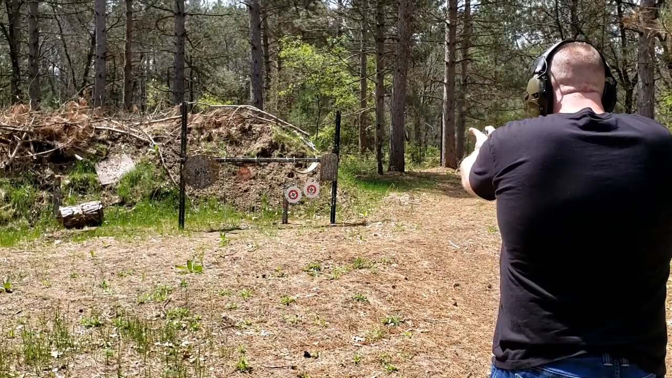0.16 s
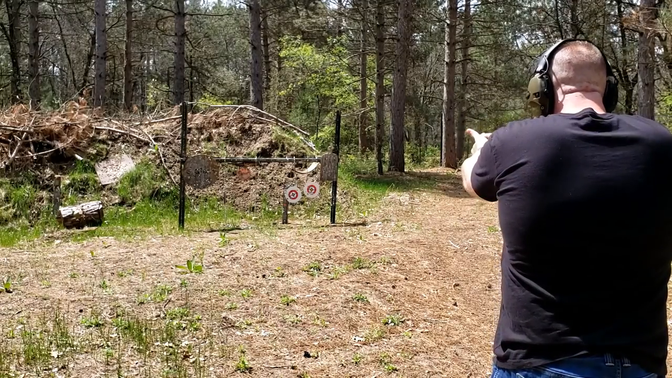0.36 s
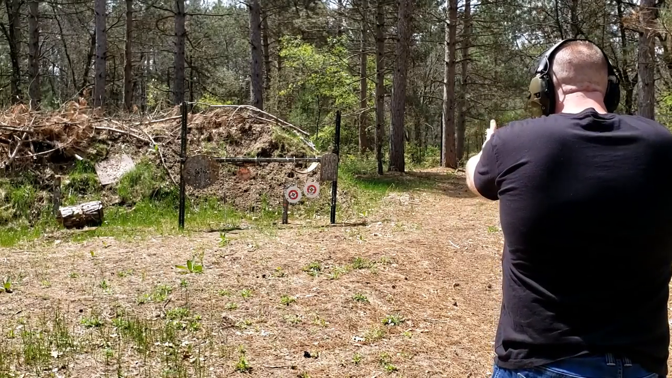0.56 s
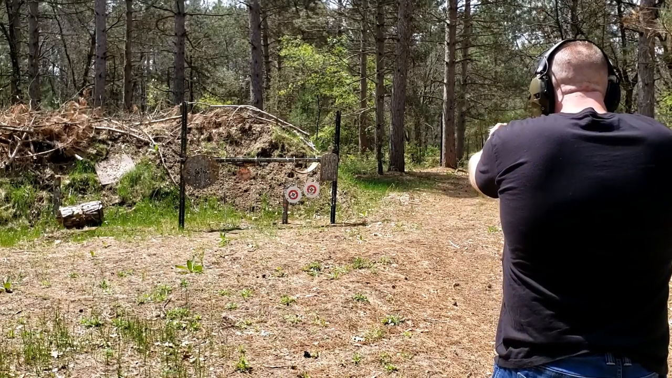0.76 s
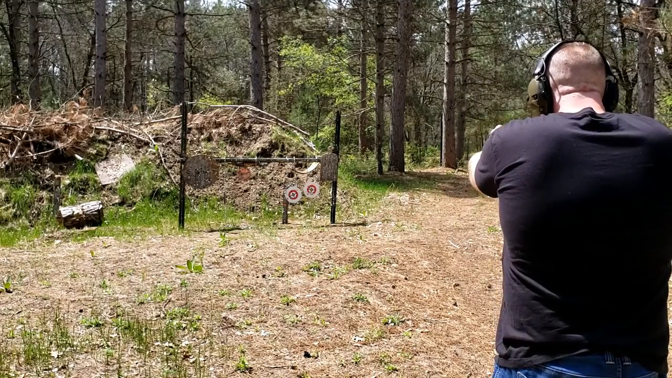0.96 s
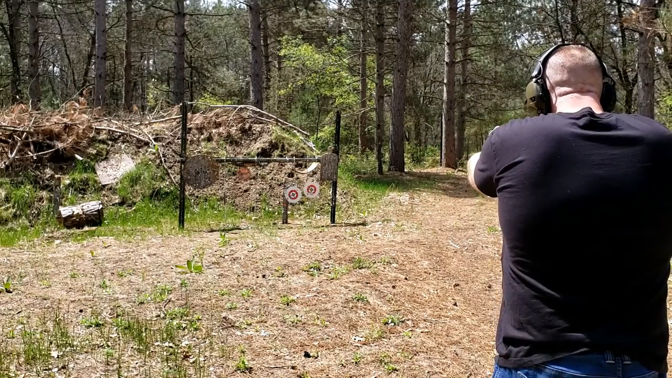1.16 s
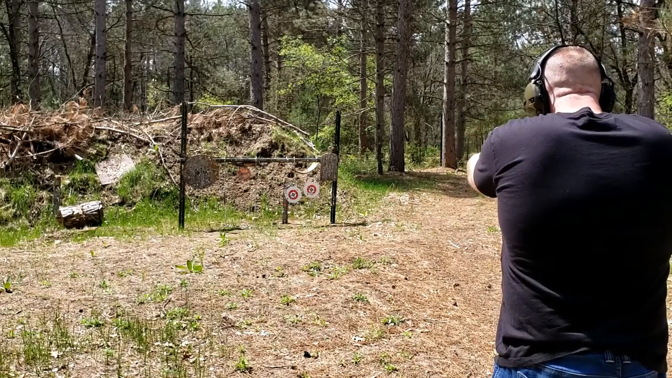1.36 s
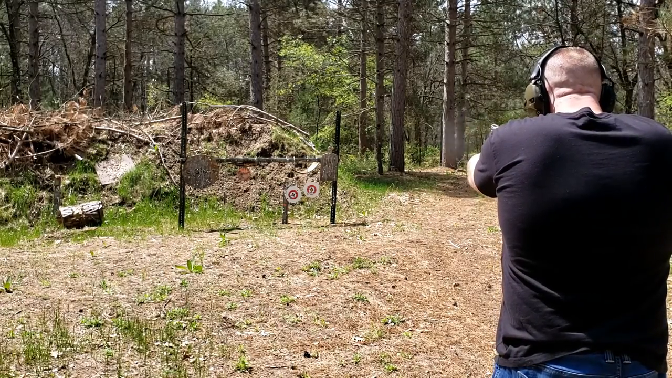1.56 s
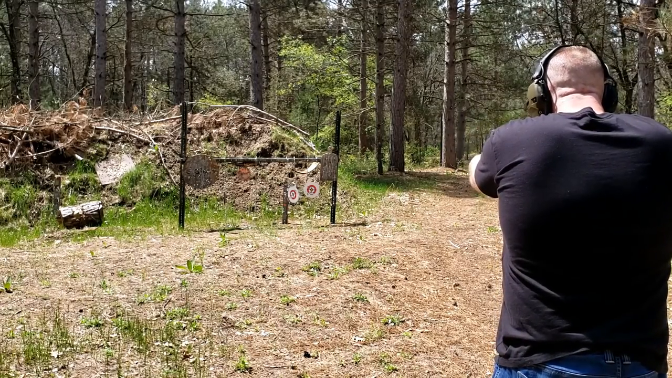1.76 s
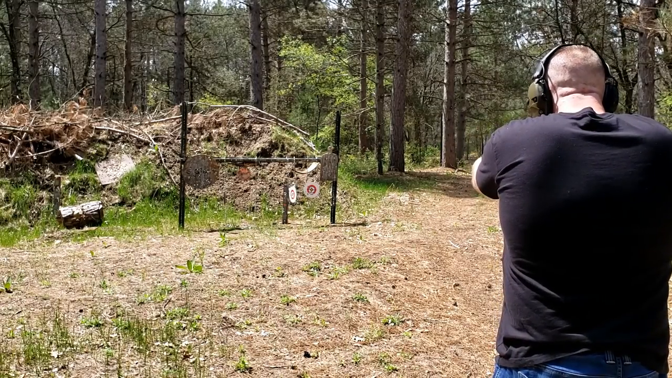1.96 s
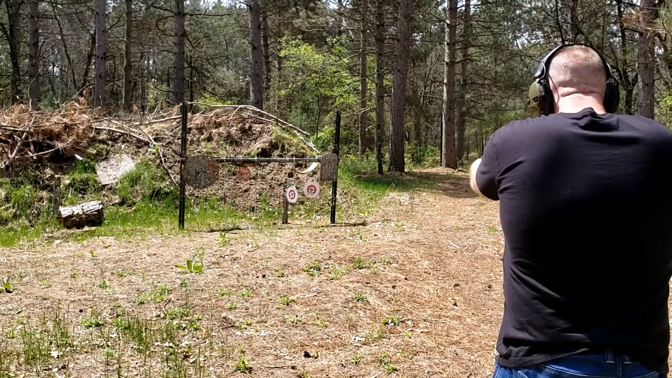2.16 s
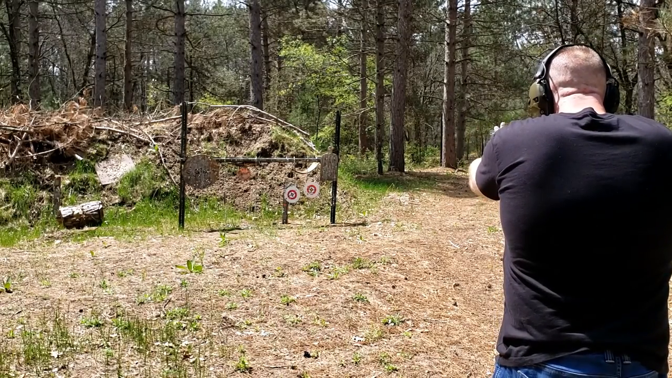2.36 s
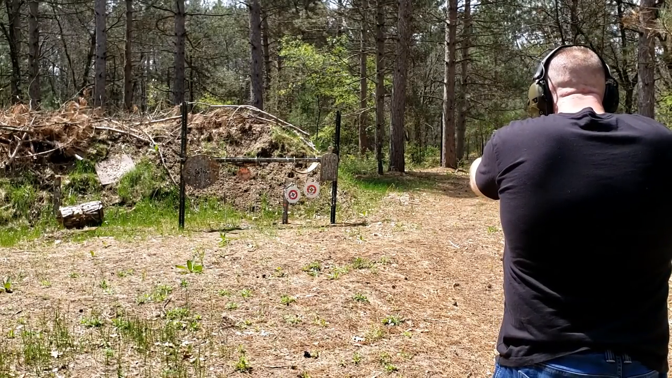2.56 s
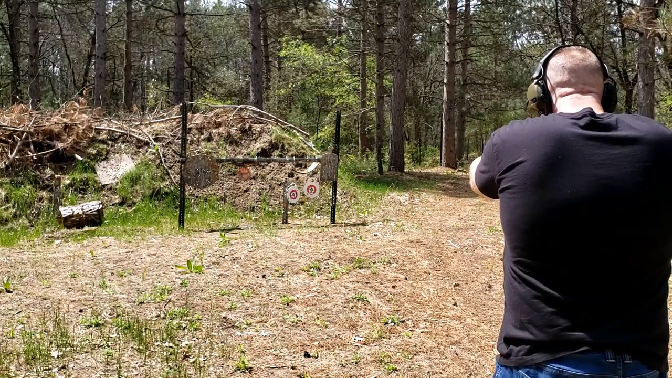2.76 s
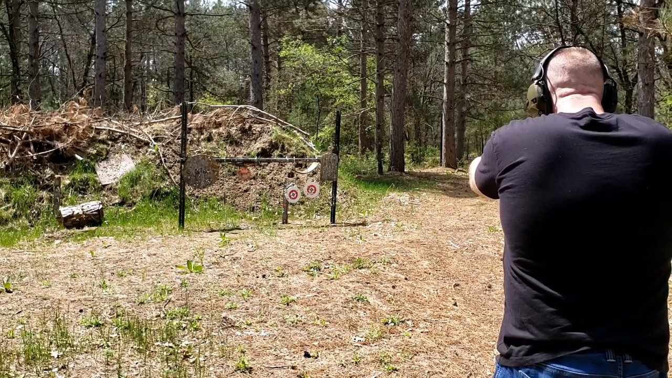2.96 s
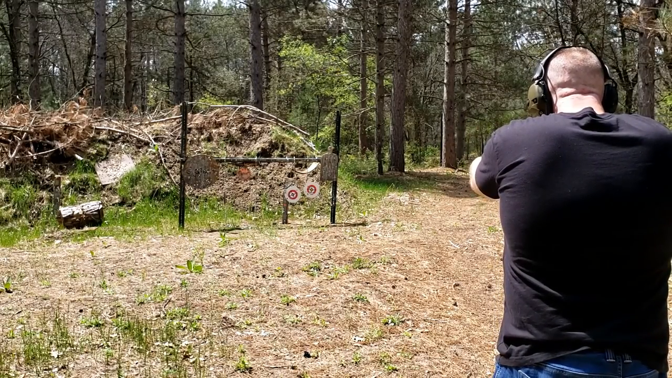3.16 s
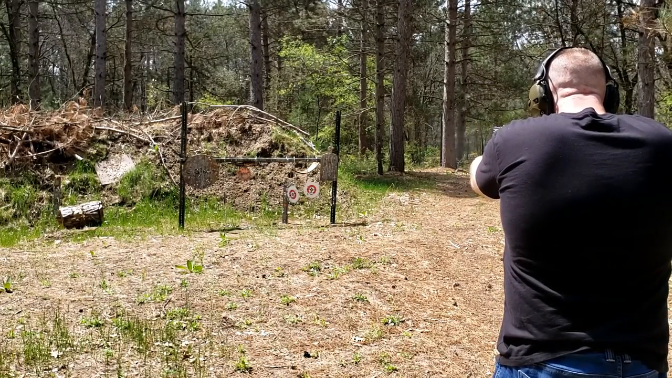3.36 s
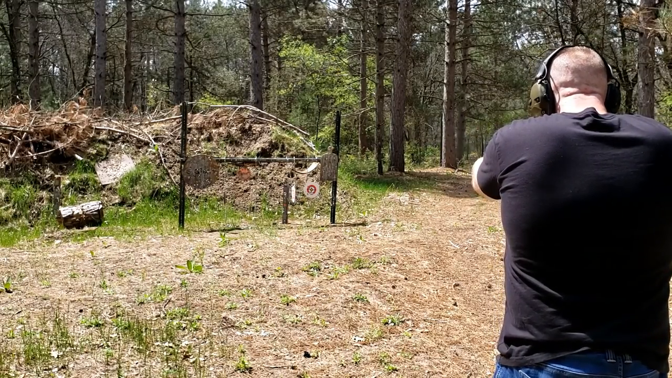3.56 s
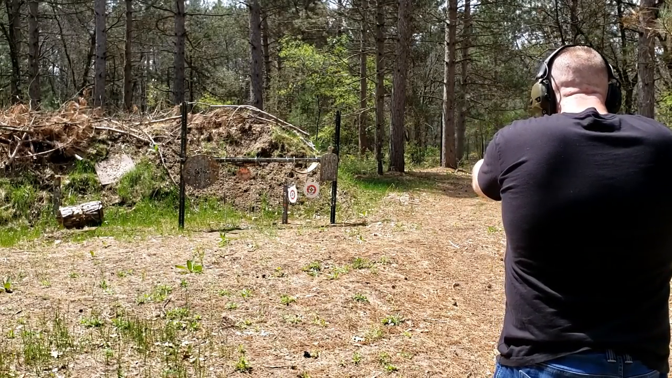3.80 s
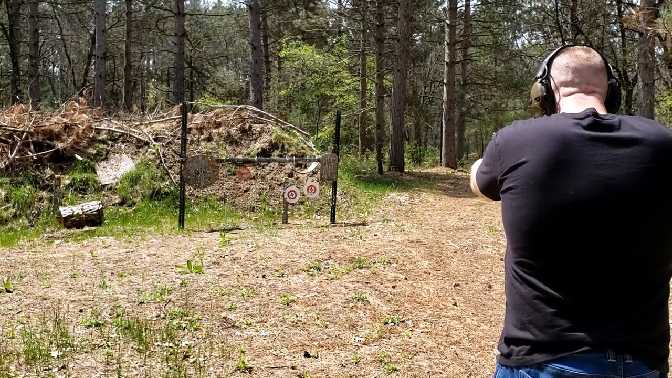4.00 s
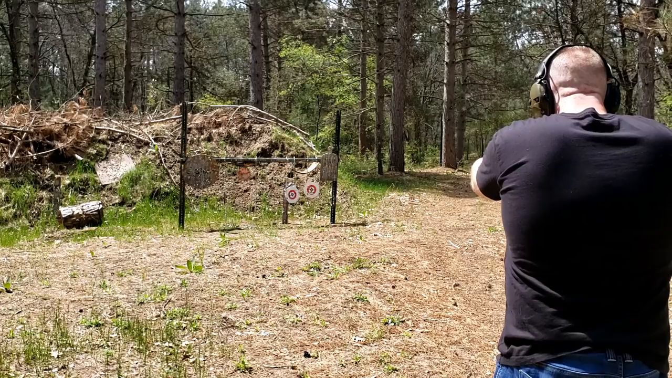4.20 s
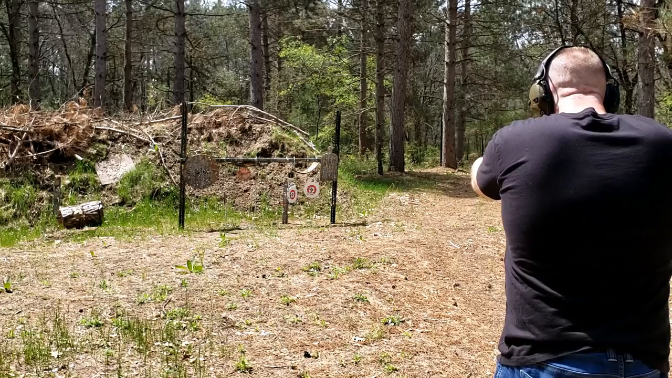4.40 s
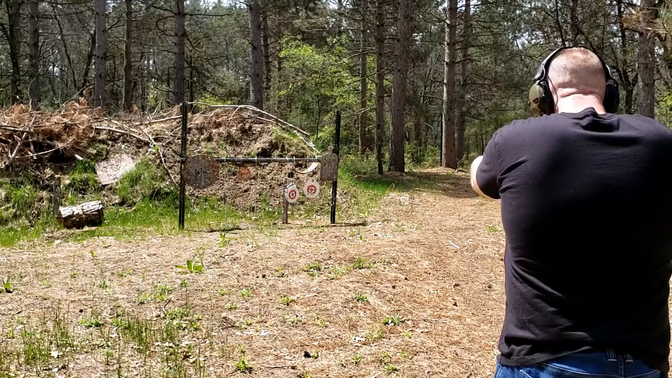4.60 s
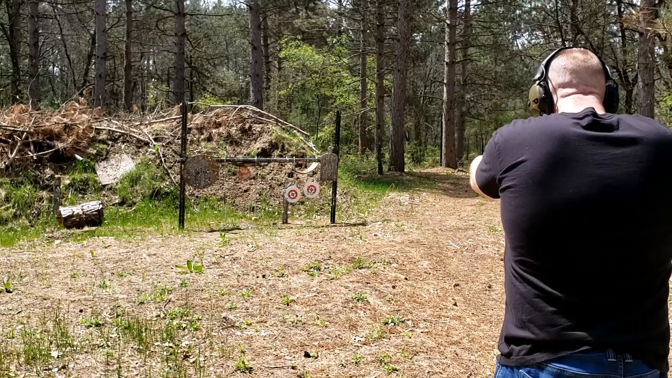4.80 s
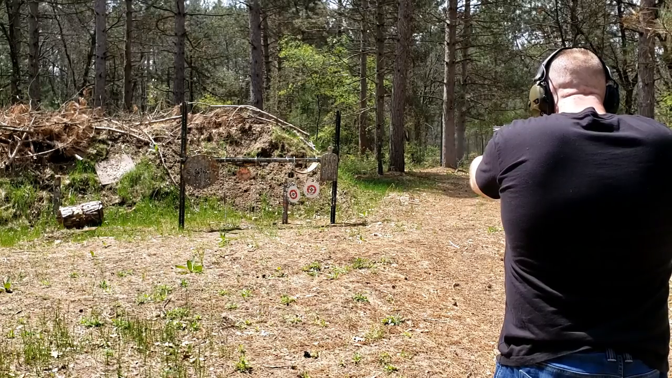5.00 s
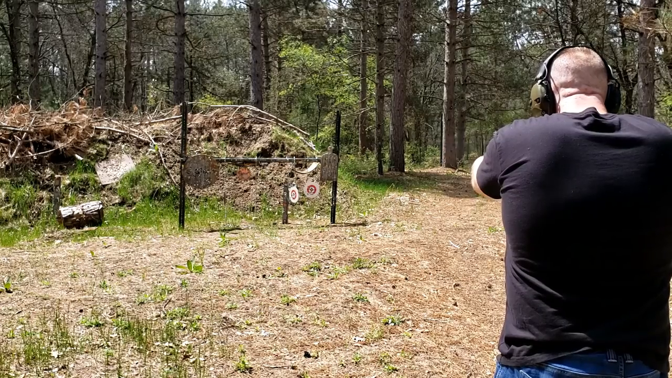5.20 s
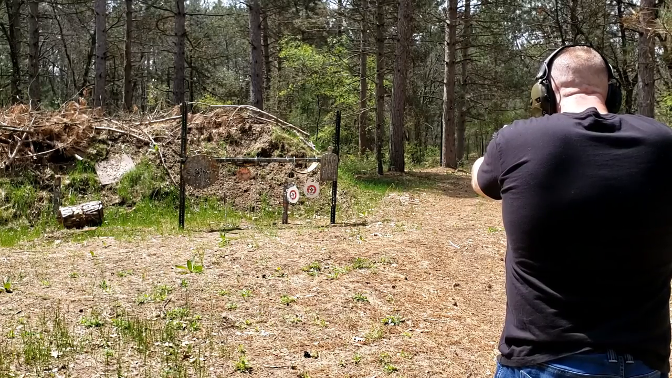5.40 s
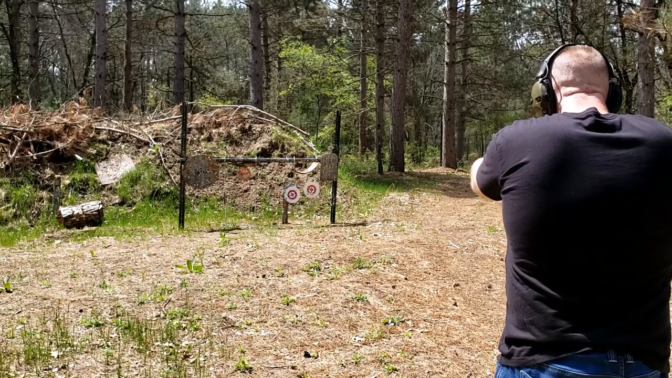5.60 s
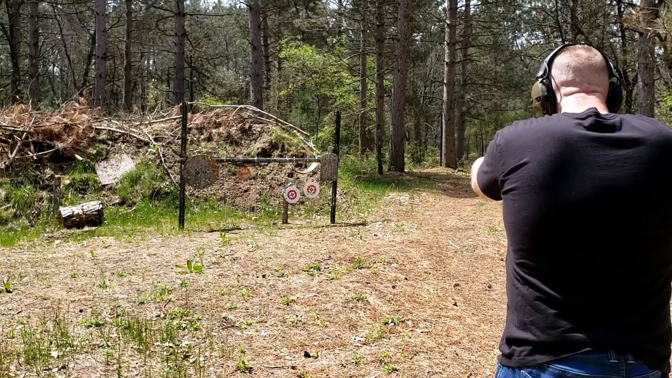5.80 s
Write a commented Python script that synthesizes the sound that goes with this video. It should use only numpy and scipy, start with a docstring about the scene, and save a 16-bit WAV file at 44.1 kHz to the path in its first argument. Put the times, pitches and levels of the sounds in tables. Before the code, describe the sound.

Outdoor shooting range among trees, microphone a few steps from the shooter. A gunshot tail fades, then three loud, clipping revolver shots come under two seconds apart, scattering briefly among the trunks. A bright steel ring follows each of the first two almost at once, leaving a thin hum; the third hit only smacks. Tiny hammer and cylinder ticks come between shots over faint breeze and distant drone.

```python
"""A shooting range in a pine wood: a small revolver fires at an even pace, a few steps from the microphone.
Each blast is a steep pressure pulse with a noisy crack, heard directly, off the ground and off a nearby
surface, with a sinking boom; banded noise makes its scatter among the trunks. Two bullets ring a swinging
steel plate, built from decaying sine modes; the last is a dead smack. Noise ticks are the hammer and cylinder,
gliding sines a bird, flickering noise bands the breeze and resonant noise a distant drone."""
import sys
import numpy as np
from scipy import signal
from scipy.fft import rfft, irfft, next_fast_len
from scipy.io import wavfile
from scipy.ndimage import uniform_filter1d

SR = 44100
rng = np.random.default_rng(int(sys.argv[2]) if len(sys.argv) > 2 else 0)


def generate_wav(signal):
    """Clip the signal to [-1, 1] and save it as 16-bit WAV at the path in sys.argv[1]."""
    frames = np.transpose(np.atleast_2d(signal))
    scaled = np.clip(frames, -1, 1) * 32767
    pcm = np.round(scaled).astype(np.int16)
    wavfile.write(sys.argv[1], SR, pcm)


N = 257984
T = np.arange(N) / SR

# Revolver shots; the first is already dying away at the start:
# start_s, level_db, muzzle_pulse_db, boom_db, boom_left_minus_right_db, boom_left_hz, boom_right_hz
SHOT_LIST = [(-.115, 0.5, 0, -7, 1, 52.3, 66.5), (1.6976, 0.5, -7, -4, -5.5, 44.75, 55),
             (3.4255, -1, -2.5, 1.5, -3, 41.86, 76.7), (5.0869, -0.5, 3.5, 1.5, -3, 42, 68)]
# Paths of the blast (direct, ground, nearby surface), levels relative to the shot:
# delay_s, left_ear_lag_s, pulse_height (gain), rise_s, pulse_length_s, crack_db, crack_decay_s
BLAST_PATHS = [(.0008, 0.000042, 1, 0.00039, 0.002, -7.5, 0.00072),
               (.0040, 0.00021, -1.39, 0.00018, 0.0014, -19.5, .001),
               (.0211, .00028, -1.2, .00022, 0.00051, -9.5, .0007)]
# Echo of the wood, levels per third of an octave relative to the shot:
# band_hz, early_db, early_t60_s, late_db, late_t60_s
WOOD_ECHO = [(50, -51, .2, -74, 1.0), (110, -45.5, 0.48, -69, 1.2), (170, -36.5, 0.3, -67, 1.5),
             (330, -40, 0.46, -64.5, 1.7), (500, -32.5, 0.65, -45, 1.76), (726, -27, 0.56, -41.5, 1.995),
             (1023, -24, 0.63, -43, 2.04), (1750, -29, 0.24, -48, 1.71), (2230, -30.5, 0.75, -46.5, 1.985),
             (3015, -32.5, 0.58, -47.5, 1.42), (5200, -32, 0.55, -47, 1.1), (7300, -31, 0.48, -52, 0.98),
             (8800, -29.5, 0.4, -45, .7), (11700, -19.5, 0.38, -52, 0.85), (16030, -24, .27, -55, .5)]
# Tone of the scattered sound, which loses its top octave: frequency_hz, gain_db
ECHO_TONE = [(6500, 0.5), (7300, 5.5), (7800, -2), (8400, -8.5), (16000, -9)]
# Bullet impacts; the last is a dead smack without ring: start_s, level_db, decay_s
BULLET_HITS = [(1.7480, -28.5, 0.0087), (3.4730, -24, 0.0067), (5.1371, -19, 0.0036)]
# Two bullets ring the plate and set it swinging: clang_db, clang_swell_s, hum_db, hum_t60_s,
# first_facing_s (after the hit), facing_interval_s, edge_on_drop_db
PLATE_RINGS = [(6, 0.059, -46, 4.08, .25, 1, 5.5), (-0.5, 0.0083, -54.5, 2.7, .48, .28, 9)]
# Modes of the steel plate: pitch_hz
PLATE_PITCHES = [2699, 3154, 3801, 4080, 4798, 5125, 5290, 5728, 6150, 6506, 6907, 7687, 7864, 8283, 8638,
                 9372, 10420, 10590, 12270, 12650, 13330, 14130, 14900, 15240]
# Ring of each mode, levels before the clang level: t60_s, first_hit_db, second_hit_db
PLATE_MODES = [(0.5, -44, -29), (0.38, -33, -36.5), (0.47, -40, -52), (0.37, -38.5, -32),
               (0.56, -41.5, -41), (0.34, -34, -30), (1.3, -70.5, -63), (0.28, -29, -58),
               (0.34, -29, -47.5), (0.37, -30.5, -36), (0.37, -26.5, -40), (0.2, -23.5, -53),
               (0.26, -28, -37), (0.18, -39.5, -46), (0.24, -31.5, -52.5), (.5, -51.5, -49.5),
               (0.17, -33.5, -55), (0.26, -37.5, -49), (.22, -33, -45), (.2, -38, -42), (.2, -37.5, -42),
               (.2, -43, -46), (.18, -34, -53.5), (0.15, -35.5, -52)]
# Hammer and cylinder clicks: start_s, level_db
GUN_CLICKS = [(0.4274, -67), (0.4923, -63), (2.3154, -60.5), (4.046, -64.5), (4.1115, -71), (4.1375, -76.5),
              (5.623, -72), (5.6945, -63.5)]
# Colour of those clicks: frequency_hz, gain_db
CLICK_TONE = [(1500, -16), (4500, -7), (7300, 8), (8800, -2), (10500, 3), (13000, 1), (16000, -8)]
# Bird calls: start_s, level_db
CALLS = [(.567, -78), (.694, -80)]
# Falling and rising note of a call, levels relative to the call:
# delay_s, length_s, start_hz, middle_hz, end_hz, level_db
CALL_NOTES = [(0, 0.034, 6240, 4980, 4260, 0), (.055, .025, 6150, 6850, 6980, -6)]
# Breeze in the trees, before its flicker: band_hz, level_db (per third of an octave)
BREEZE_BANDS = [(25, -102), (45, -85.5), (70, -76.5), (140, -70.5), (250, -84), (450, -79.5), (800, -71.5),
                (1250, -81), (1800, -89.5), (3000, -106), (6000, -107), (16000, -104)]
# Resonances of the far low drone, relative levels: centre_hz, width_hz, level_db
DRONE_RESONANCES = [(146, 70, -1), (273, 89, -6.5), (407, 90, -12)]
# Swells of the drone; the hold follows the attack: start_s, hold_s, level_db
DRONE_SWELLS = [(1.223, .34, -57.5), (2.9, 0.67, -63)]


def undb(db):
    """Decibels to gain."""
    return 10 ** (np.asarray(db) / 20)


def fade(t, t60):
    """Exponential decay by 60 dB in t60 seconds."""
    return np.exp(-np.log(1000) * t / t60)


def pan(db):
    """Left and right gains for a left-minus-right level difference."""
    return undb(np.array([[db], [-db]]) / 2)


def unit(x):
    """Scale to rms 1."""
    return x / np.sqrt(np.mean(x ** 2))


def add(out, s, sound):
    """Mix a sound in at time s, trimming whatever falls outside the scene."""
    i = int(round(s * SR))
    sound = sound[..., max(-i, 0):N - i]
    first = max(i, 0)
    out[:, first:first + sound.shape[-1]] += sound


def at(hz, table):
    """Read the columns of a table on a log-frequency axis."""
    f, *columns = np.transpose(table)
    return [np.interp(np.log(hz + 1e-9), np.log(f), c) for c in columns]


def shape(x, table):
    """Filter by a frequency_hz, gain_db spectrum."""
    n = x.shape[-1]
    hz = np.arange(n // 2 + 1) * SR / n
    return irfft(rfft(x) * undb(at(hz, table)[0]), n)


def colour(x, table):
    """Filter by a spectrum, then scale to rms 1."""
    return unit(shape(x, table))


def bands(x, alike_hz, count=29):
    """Split two noises into third-octave bands; below alike_hz both ears hear nearly the same."""
    n = x.shape[-1]
    spectrum = rfft(x)
    octave = np.log2(np.arange(n // 2 + 1) * SR / n + 1e-9)
    for hz in 22.5 * 2 ** (np.arange(count + 1) / 3):
        thirds_away = np.clip(3 * (octave - np.log2(hz)), -1, 1)
        mid, side = irfft(spectrum * np.cos(np.pi / 2 * thirds_away), n)
        stereo = mid + np.outer([1, -1], side) * min(hz / alike_hz, 1)
        yield hz, unit(stereo) * np.sqrt(1 / 2)


def tick(db, decay_s, spectrum):
    """A short coloured burst of contact noise."""
    t = np.arange(SR // 10) / SR
    noise = rng.standard_normal((2, len(t)))
    return undb(db) * colour(noise, spectrum) * np.exp(-t / decay_s)


def boom(t, level_db, pan_db, pitch_hz, delay_s=.0058, length_s=0.016, height=0.37, sag_s=0.066):
    """A low pressure swing follows the direct blast, sinking in pitch."""
    age = np.maximum(t - delay_s, 0)
    cycles = np.outer(pitch_hz, sag_s * np.log1p(age / sag_s))
    swing = np.sin(2 * np.pi * cycles) * np.exp(-(age / length_s) ** 2)
    return height * undb(level_db) * pan(pan_db) * swing


def blast(muzzle_db, boom_db, boom_pan_db, boom_hz, front_s=.0006):
    """Each path brings a steep pressure pulse that swings through rest, with a crackling front; a boom joins in."""
    t = np.arange(SR // 4) / SR
    out = np.zeros((2, len(t)))
    crack_tone = [(200, -8.5), (900, 8.5), (3500, -3.5), (7000, -15.0), (9000, -16.0), (16000, -10)]
    for k, (delay, lag, height, rise_s, length, crack_db, crack_s) in enumerate(BLAST_PATHS):
        direct = k == 0  # the muzzle level acts on the direct path only
        since = t - delay - np.array([[lag], [0]])
        age = np.maximum(since, 0)
        rise = 1 - np.exp(-(age / rise_s) ** 2)
        pulse = rise * (1 - age / length) * np.exp(-age / length)
        out += height * pulse * undb(muzzle_db * direct)
        front = since + front_s * direct  # on the direct path the crack runs ahead of the gas
        crack = colour(rng.standard_normal(out.shape), crack_tone)
        crack_envelope = (front > 0) * np.exp(-abs(front) / crack_s)
        out += undb(crack_db + muzzle_db / 2 * direct) * crack * crack_envelope
    return out + boom(t, boom_db, boom_pan_db, boom_hz)


def wood(grain_db=1.5, build_s=0.0015, late_build_s=0.03, flutter_db=0.44, trunks_s=0.028, litter_db=-5.0):
    """Ground litter scatters the blast at once, then countless trunks; the far wood answers late and dull."""
    t = np.arange(2 * SR) / SR
    # grains of 30 samples differ randomly in size
    grains = np.minimum(rng.exponential(size=len(t) // 30), 4)
    echoes = rng.standard_normal((2, len(t))) * undb(grain_db * np.repeat(grains, 30))
    wobble = uniform_filter1d(rng.standard_normal(len(t)), SR // 120)
    flutter = undb(flutter_db * unit(wobble))
    near = (1 - np.exp(-t / build_s)) * undb(litter_db * (t < trunks_s))
    far = 1 - np.exp(-t / late_build_s)
    out = 0
    for hz, band in bands(echoes, alike_hz=650):
        early_db, early_t60, late_db, late_t60 = at(hz, WOOD_ECHO)
        early = undb(early_db) * near * fade(t, early_t60)
        late = undb(late_db) * far * fade(t, late_t60)
        out = out + band * np.hypot(early, late)
    return shape(out * flutter, ECHO_TONE)[:, :-SR // 10] * pan(1.4)


def bullet_smack(db, decay_s):
    """A bullet's impact is a bright, fast-dying burst of noise."""
    return tick(db, decay_s, [(300, -5.5), (1500, -6.5), (4000, 3.5), (7200, 8.0), (9000, -13.5), (16000, -16.5)])


def plate(hit, swell_s, waver_db=-0.5, waver_hz=8, twin_db=-21, twin_split_hz=7, twin_t60_ratio=2.12):
    """Steel modes swell and waver as the plate turns; each beats with a weaker twin that rings longer."""
    t = np.arange(3 * SR // 2) / SR
    out = 0
    for hz, (t60, *db) in zip(PLATE_PITCHES, PLATE_MODES):
        phase = rng.uniform(0, 2 * np.pi, 4)
        waver = undb(waver_db * np.sin(2 * np.pi * waver_hz * t + phase[2]))
        ears = phase[0] + np.array([[0], [1.4]]) * np.cos(phase[1])
        mode = np.sin(2 * np.pi * hz * t + ears) * fade(t, t60)
        twin_hz = hz + twin_split_hz * np.cos(phase[3])  # up to the split above or below
        twin = np.sin(2 * np.pi * twin_hz * t - ears) * fade(t, t60 * twin_t60_ratio)
        out = out + np.sqrt(2) * undb(db[hit]) * (mode + undb(twin_db) * twin) * waver
    return out * (1 - np.exp(-(t / swell_s) ** 2)) * pan(1.9)


def hum(s, db, t60, facing_s, facing_interval_s, edge_on_db, pitch_hz=1773.5, build_s=0.073):
    """The plate's lowest mode emerges after the clang; it radiates from the faces and less from the edge."""
    t = np.maximum(T - s, 0)
    angle = np.pi * (t - facing_s) / facing_interval_s
    facing = np.hypot(np.cos(angle), undb(-edge_on_db) * np.sin(angle))
    envelope = undb(db) * facing * fade(t, t60) * (1 - np.exp(-(t / build_s) ** 2))
    tone = np.sin(2 * np.pi * pitch_hz * T + np.array([[0], [.8]]))
    return np.sqrt(2) * envelope * tone * pan(-1.5)


def gun_click(db):
    """Hammer and cylinder parts meet in a tiny bright tick."""
    return tick(db, 0.0034, CLICK_TONE)


def chirp(length, start_hz, middle_hz, end_hz, db):
    """One bird note: a whistle gliding along a curve through three pitches."""
    u = np.linspace(0, 1, int(length * SR))
    hz = np.polyval(np.polyfit([0, .5, 1], [start_hz, middle_hz, end_hz], 2), u)
    whistle = np.sin(2 * np.pi * np.cumsum(hz) / SR)
    return undb(db) * whistle * np.sqrt(abs(np.sin(np.pi * u)))


def breeze(flicker_db=4.5, count=50):
    """Breeze in the trees: a low rush of noise whose bands flicker independently."""
    out = 0
    for hz, band in bands(rng.standard_normal((2, next_fast_len(N))), alike_hz=620):
        flicker = np.interp(T, np.linspace(0, T[-1], count), rng.standard_normal(count))
        out = out + band[:, :N] * undb(at(hz, BREEZE_BANDS)[0] + flicker_db * flicker)
    return out


def drone(rest_db=-68.5, attack_s=.1, release_s=.16):
    """A distant rumble of noise in three resonances that swells, holds and sinks back."""
    f = np.arange(N // 2 + 1) * SR / N
    gain = sum(undb(db) / (1 + (2 * (f - hz) / width) ** 4) for hz, width, db in DRONE_RESONANCES)
    level = undb(rest_db)
    for s, hold_s, db in DRONE_SWELLS:
        attack = np.clip((T - s) / attack_s, 0, 1)
        release = np.exp(-np.maximum(T - s - attack_s - hold_s, 0) / release_s)
        level = np.hypot(level, undb(db) * attack * release)
    rumble = irfft(rfft(rng.standard_normal(N)) * gain, N)
    return unit(rumble) * level


def scene():
    """Shots and their echoes, bullet impacts, the ringing plate, the gun's clicks, the bird and the wood around."""
    out = breeze() + drone()
    for s, db, muzzle_db, boom_db, boom_pan_db, *boom_hz in SHOT_LIST:
        add(out, s, undb(db) * blast(muzzle_db, boom_db, boom_pan_db, boom_hz))
        add(out, s, undb(db) * wood())
    for k, (db, swell_s, *swing) in enumerate(PLATE_RINGS):
        s, next_s = BULLET_HITS[k][0], BULLET_HITS[k + 1][0]
        add(out, s, undb(db) * plate(k, swell_s))
        out += hum(s, *swing) * (T < next_s)  # the hum stops at the next bullet impact
    for s, db, decay_s in BULLET_HITS:
        add(out, s, bullet_smack(db, decay_s))
    for s, db in GUN_CLICKS:
        add(out, s, gun_click(db))
    for s, db in CALLS:
        for delay, *note in CALL_NOTES:
            add(out, s + delay, undb(db) * chirp(*note))
    return out


def record(dry, low_cut_hz=18, top_hz=16100):
    """The microphone sheds the deepest bass and the blast overloads it; the top is cut."""
    low_cut = signal.butter(1, low_cut_hz, "high", fs=SR, output="sos")
    top_cut = signal.ellip(8, .2, 70, top_hz, fs=SR, output="sos")
    overloaded = np.clip(signal.sosfilt(low_cut, dry), -1, 1)
    return signal.sosfilt(top_cut, overloaded)


dry = scene()
out = record(dry)
generate_wav(out)
```